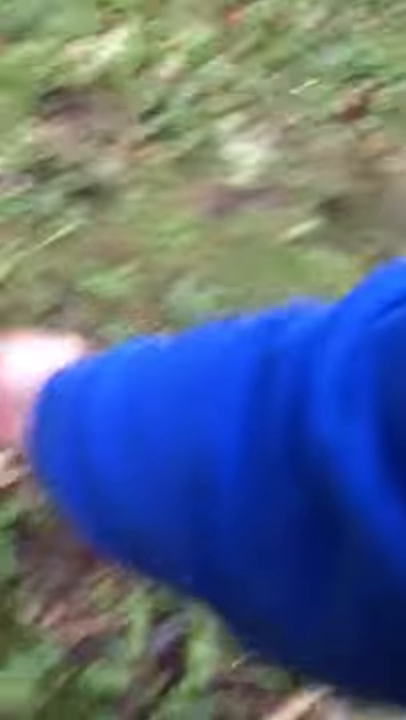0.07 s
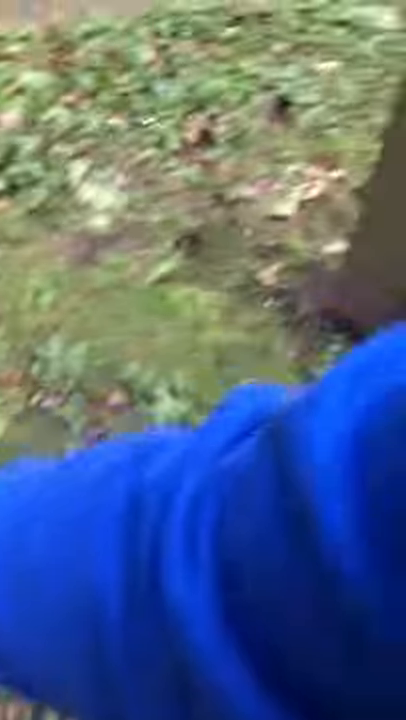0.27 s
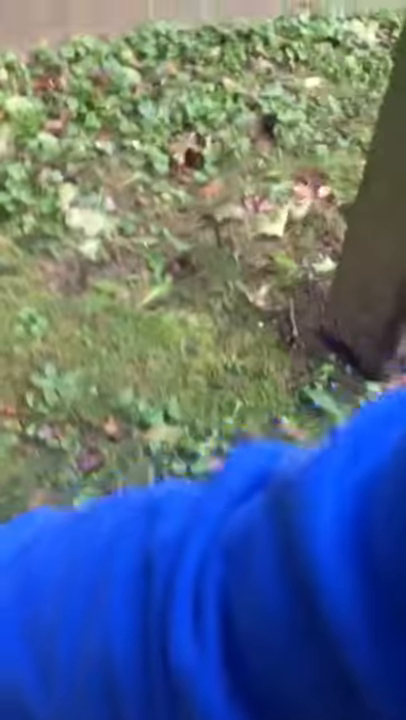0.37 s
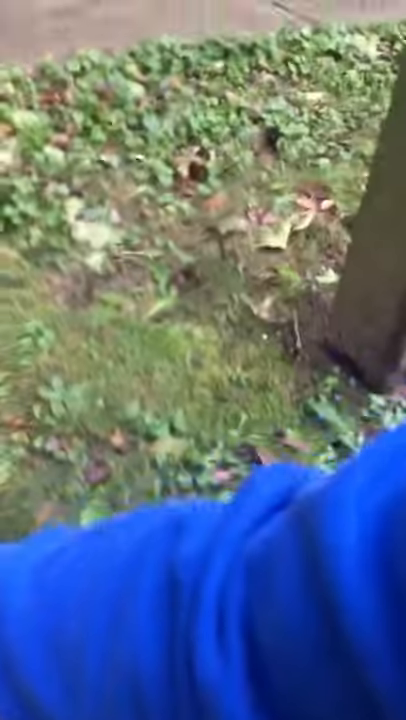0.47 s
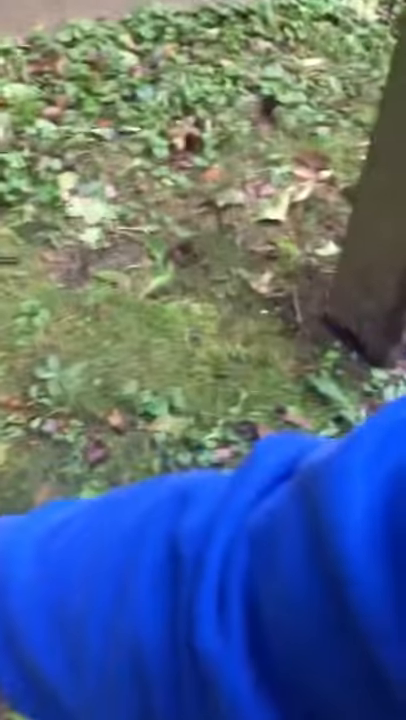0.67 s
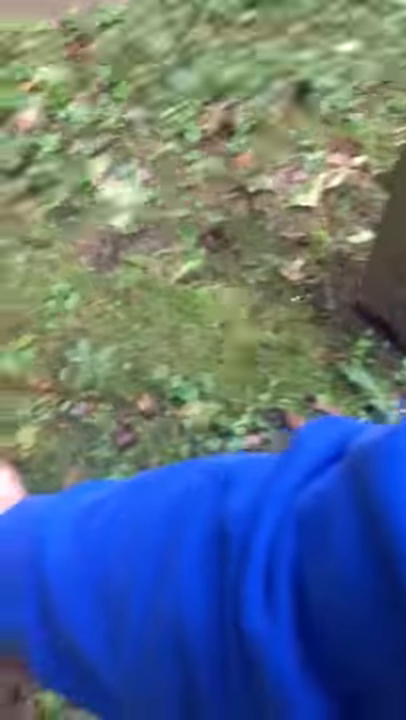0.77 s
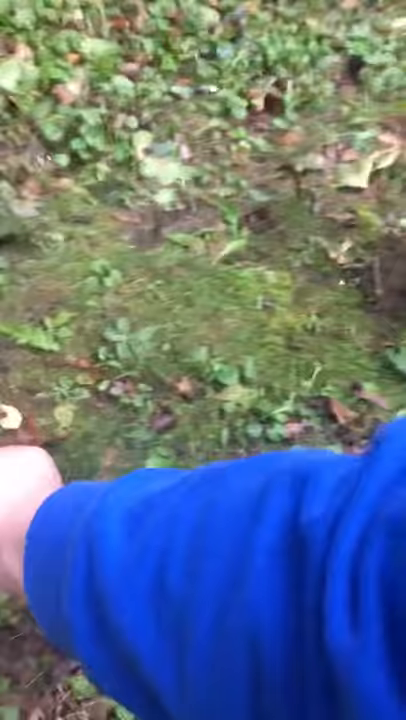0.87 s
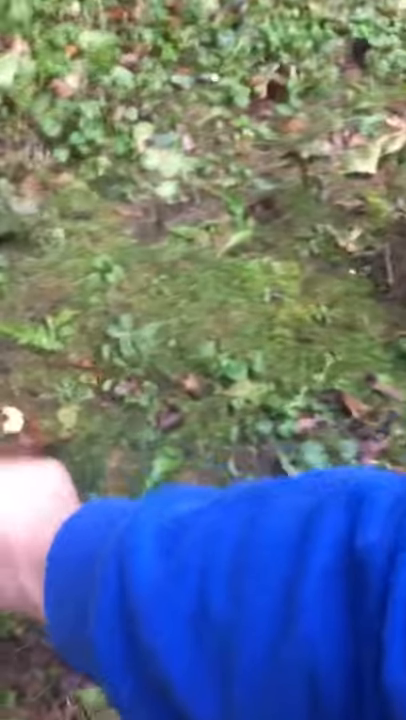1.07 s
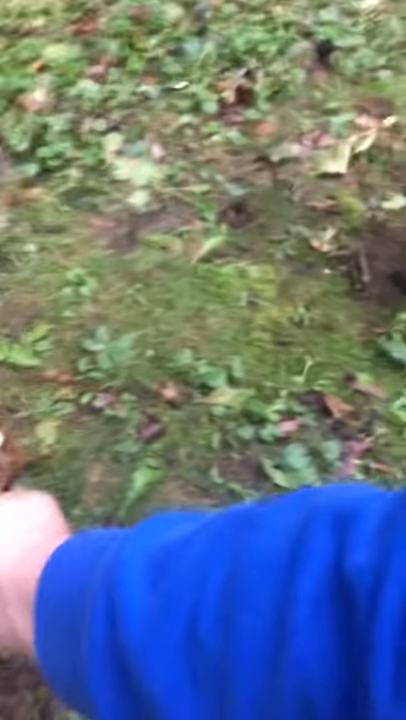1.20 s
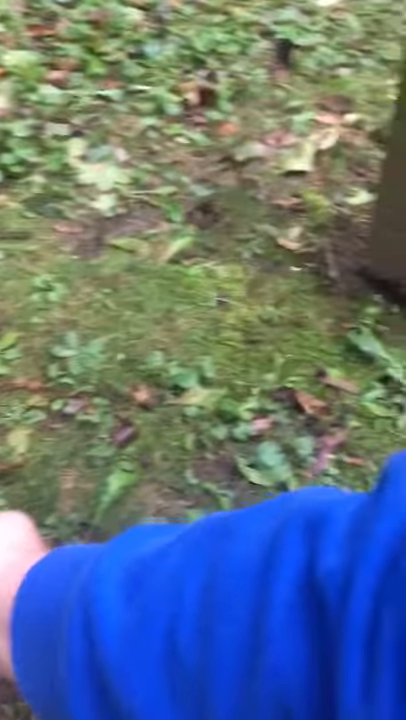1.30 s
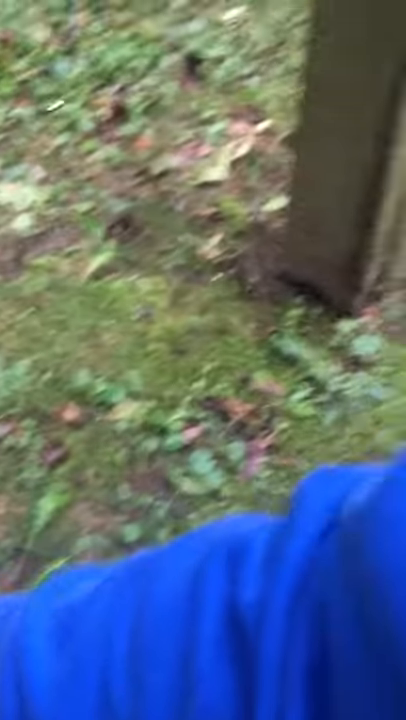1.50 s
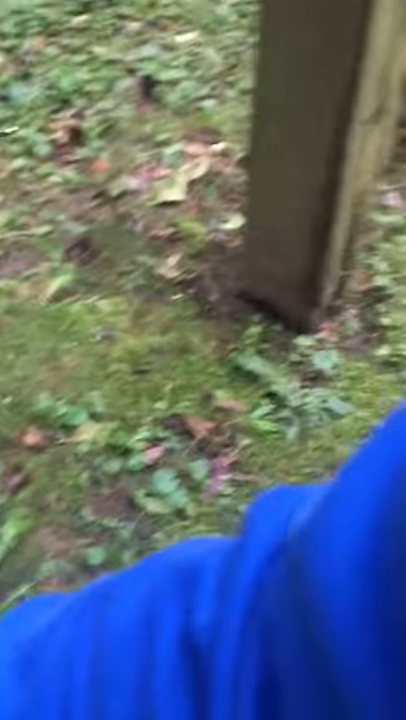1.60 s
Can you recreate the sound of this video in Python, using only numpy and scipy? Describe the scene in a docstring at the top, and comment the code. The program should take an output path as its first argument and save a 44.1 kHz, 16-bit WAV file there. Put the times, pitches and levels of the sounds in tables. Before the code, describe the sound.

Close fleece rustling in two hissy swipes with brief clicks in a quiet garden.

```python
"""Fleece sleeve brushing a phone

After one brief scuff, a fleece sleeve brushes twice past a hand-held phone in a quiet garden.
Countless fibres catch and slip as a bright hiss over a duller rub, and single threads tick free.
A few sharp, close clicks snap and ring for a millisecond; the hand bumps softly as its grip shifts.
Underneath lies an outdoor bed of low rumble, distant hum, air and faint hiss. The sound is mono."""
import sys
import numpy as np
from scipy import signal
from scipy.fft import rfft, irfft, next_fast_len
from scipy.io import wavfile
from scipy.ndimage import uniform_filter1d

SR = 44100
rng = np.random.default_rng(int(sys.argv[2]) if len(sys.argv) > 2 else 0)


def wav_out(sig):
    """Save sig, one row per channel (or a flat mono array), as 16-bit PCM at SR to the path in sys.argv[1]."""
    wavfile.write(sys.argv[1], SR, np.round(np.clip(np.atleast_2d(sig).T, -1, 1) * 32767).astype(np.int16))


N = 72765

# sleeve speed in each stroke, as the envelope of its hiss (time [s], level [dB])
FIRST_STROKE = [(.11, -64), (.145, -61), (.2, -47.5), (.23, -40.5), (.275, -38.5), (.3, -35.5), (.35, -35),
                (.385, -40), (.415, -48), (.45, -54), (.515, -58.5), (.545, -65), (.61, -67.5)]
SECOND_STROKE = [(.6, -63), (.665, -54.5), (.715, -46), (.752, -46.5), (.81, -46), (.855, -39.5),
                 (.9, -40.5), (.93, -42.5), (.965, -43), (.995, -48), (1.015, -53), (1.06, -65),
                 (1.085, -70.5)]
# envelopes of the dull rub, the thin top sheen and the narrow rasp (time [s], level [dB])
RUB_LEVEL = [(.12, -68.5), (.2, -60.5), (.29, -53), (.35, -53), (.42, -58.5), (.5, -60.5), (.57, -67),
             (.62, -66), (.69, -61), (.77, -68.5), (.88, -63), (.97, -81), (1.08, -65.5)]
SHEEN_LEVEL = [(.115, -72), (.165, -54), (.23, -51), (.3, -52), (.36, -43), (.41, -61)]
RASP_LEVEL = [(.78, -64), (.825, -63), (.85, -54.5), (.885, -78), (.93, -72), (.98, -100), (1.02, -82)]
# tone of the two strokes, the rub and the scuff (frequency [Hz], relative level [dB])
FIRST_EQ = [(1500, -48.5), (3000, -14.5), (4200, -12), (5600, -16), (7000, -6), (9000, -1), (10200, 0.5),
            (12300, -3.5), (14300, -0.5), (16000, -3)]
SECOND_EQ = [(1500, -23.5), (3200, -17), (4400, -12), (5700, -17), (6600, -9), (7600, -5.5), (9100, -0.5),
             (10000, 0), (12500, -2), (14000, -6.5), (16000, -2)]
RUB_EQ = [(120, -12.5), (280, 7), (700, 0), (1200, 0), (2000, -0.5), (3500, -8), (6000, 1.5), (10000, -24)]
SCUFF_EQ = [(2000, -20), (3000, -34), (4000, -10), (4900, -31), (5800, -14), (6700, -20), (7600, -7),
            (9000, 1), (11000, -1.5), (13500, 1.5), (15200, 3), (16500, -2.5)]
# close clicks (time [s], snap peak [dB], ring gain [dB], ring length [factor], knock peak [dB])
CLICKS = [(0.3274, -17.5, -46, .7, -42), (.3578, -6, -55, 0.59, -23), (.367, -18, -47, .8, -50),
          (0.4, -32, -5.5, 0.96, -29.5), (0.435, -45.5, -49.5, 0.82, -36.5),
          (0.4715, -27.5, -41, 0.61, -49), (.514, -23.5, -54, 1, -51)]
# resonances of a click (frequency [Hz], relative level [dB], time constant [ms])
CLICK_MODES = [(302, -37, .8), (1780, -22.5, 0.24), (3870, -13, .19), (4400, -17, 0.26), (7990, -1.5, 0.18),
               (9270, -3, 0.22), (10400, -5, .17), (12680, -9.5, 0.12), (15640, -15, .2)]
# threads letting go (time [s], peak [dB])
THREAD_TICKS = [(.6585, -38), (.7072, -28), (.726, -31), (.739, -39), (1.0643, -31), (1.0669, -40),
                (1.0755, -43)]
# tone of the dry snap, the dull knock and the crisp tick (frequency [Hz], relative level [dB])
SNAP_EQ = [(300, -29.5), (1500, -22), (3000, -14.5), (4600, -6), (6000, -9.5), (8000, -3.5), (10800, 0),
           (13000, -1.5), (16000, -8)]
KNOCK_EQ = [(60, -9.5), (150, 0), (290, 4.5), (560, -5.5), (1000, 1), (1900, 0), (2700, -4), (4000, 0),
            (6000, 0), (10000, -16)]
TICK_EQ = [(2500, -45), (3900, -15), (4700, -4.5), (6200, -23), (7900, 1.5), (8800, -11.5), (10500, 2),
           (13000, -2), (16000, -9)]
# bumps of the hand on the phone (time [s], half-width [s], frequency [Hz], level [dB])
HAND_BUMPS = [(.22, 0.021, 74, -52.5), (0.965, .04, 94.5, -52)]
# tone of the outdoor layers (frequency [Hz], relative level [dB])
RUMBLE_EQ = [(20, -2.5), (40, -7), (60, 0.5), (82, 0.5), (125, -3.5), (170, -5), (250, -14), (400, -37)]
AIR_EQ = [(150, 3), (230, -6.5), (330, 0), (480, -0.5), (650, -1.5), (1000, -5), (1800, -15.5), (2900, -14),
          (3600, -38), (6000, -44.5), (11000, -15.5)]
HISS_EQ = [(2000, -11), (6000, -12), (8500, -12.5), (10000, -12.5), (11200, -18.5), (13000, -30),
           (16000, -15.5)]
# envelopes of the outdoor layers (time [s], level [dB])
HUM_LEVEL = [(0, -71), (.9, -83.5), (1.3, -69.5), (1.65, -72)]
AIR_LEVEL = [(0, -65.5), (.6, -65.5), (1.1, -62.5), (1.4, -62), (1.65, -61)]
HISS_LEVEL = [(0, -68.5), (.6, -67.5), (1.15, -73), (1.35, -73.5), (1.55, -69), (1.65, -82)]

SLIPS_PER_S, SLIP_SPREAD_DB = 20000, 2.57
FLUTTER_HZ, FLUTTER_DB = 89, 1.29
SNAGS_PER_S, SNAG_DB, SNAG_SPEED_POWER = 130, -51.5, 0.56


def sleeve_stroke(envelope, eq):
    """Fast sliding merges fibre slips into hiss; single snags stand out while the sleeve is slow."""
    gain = curve(envelope)
    fibres = colour(slips(SLIPS_PER_S, SLIP_SPREAD_DB), eq)
    hiss = unit(moving_folds(fibres)) * gain
    flutter = undb(FLUTTER_DB * waver(FLUTTER_HZ))
    snags = unit(colour(slips(SNAGS_PER_S, spread_db=2.2), eq))
    snag_gain = undb(SNAG_DB) * (gain / gain.max()) ** SNAG_SPEED_POWER
    return hiss * flutter + snags * snag_gain


def slips(per_s, spread_db):
    """Fibres catch and slip as tiny random impulses, most weak and a few strong; rms 1."""
    happens = rng.random(N) < per_s / SR
    strength = undb(spread_db * np.minimum(rng.exponential(size=N), 5))
    return unit(happens * strength * rng.choice([-1, 1], N))


def moving_folds(hiss, band_hz=1300, drift_hz=18, drift_db=1.1):
    """The tone shifts as the folds move: each band of the hiss drifts in level on its own."""
    f, spectrum = np.fft.rfftfreq(N, 1 / SR), rfft(hiss)
    out = 0
    for k in range(15):
        share = np.clip(1 - np.abs(f / band_hz - k), 0, 1)
        out = out + irfft(spectrum * share, N) * undb(drift_db * waver(drift_hz))
    return out


def narrow_slide(envelope, hz, octaves):
    """Fibre slips that favour one narrow range of pitch."""
    return curve(envelope) * band(slips(SLIPS_PER_S, SLIP_SPREAD_DB), hz, octaves)


def cloth_rub():
    """Duller cloth friction gives body under the hiss."""
    return unit(colour(slips(SLIPS_PER_S, spread_db=3), RUB_EQ)) * curve(RUB_LEVEL)


def scuff(start_s=0.0942, attack_s=0.004, hold_s=0.01, decay_s=0.0048, level_db=-42):
    """One quick slide of cloth: a short burst of fibre slips."""
    age = np.arange(N) / SR - start_s
    attack = np.clip(age / attack_s, 0, 1)
    release = np.exp(-np.maximum(age - attack_s - hold_s, 0) / decay_s)
    fibres = unit(colour(slips(SLIPS_PER_S, SLIP_SPREAD_DB), SCUFF_EQ))
    return undb(level_db) * attack * release * fibres


def clicks():
    """Each click layers a dry snap, a dull knock and a damped ring about a millisecond long."""
    t = np.arange(N // 100) / SR
    snap, knock = transient(SNAP_EQ, len(t)), transient(KNOCK_EQ, len(t))
    out = np.zeros(N + len(t))
    for s, snap_db, ring_db, length, knock_db in CLICKS:
        ring = 0
        for hz, db, ms in CLICK_MODES:
            age = t / (length * ms / 1000)
            swell = (age / 2) ** 2 * np.exp(2 - age)  # peaks at 1 after two time constants
            ring = ring + undb(db) * swell * np.sin(2 * np.pi * hz * t)
        start = int(s * SR)
        out[start:start + len(t)] += undb(snap_db) * snap + undb(ring_db) * ring + undb(knock_db) * knock
    return out[:N]


def thread_ticks():
    """Single threads let go with a thin, crisp tick."""
    pulses = np.zeros(N)
    for s, db in THREAD_TICKS:
        pulses[int(s * SR)] += undb(db)
    return signal.fftconvolve(pulses, transient(TICK_EQ, samples=512))[:N]


def hand_bumps():
    """Low, soft swells as the hand shifts its grip."""
    t = np.arange(N) / SR
    out = 0
    for s, half_width, hz, db in HAND_BUMPS:
        swell = np.exp(-.5 * ((t - s) / half_width) ** 2)
        out = out + undb(db) * swell * band(rng.standard_normal(N), hz, octaves=0.46)
    return out


def garden_bed(rumble_db=-56):
    """Distant rumble and hum, a soft wash of air and a thin hiss."""
    rumble = undb(rumble_db) * noise(RUMBLE_EQ)
    hum = curve(HUM_LEVEL) * band(rng.standard_normal(N), hz=473.6, octaves=0.069)
    air = curve(AIR_LEVEL) * noise(AIR_EQ)
    hiss = curve(HISS_LEVEL) * noise(HISS_EQ)
    return rumble + hum + air + hiss


def undb(db):
    """Decibels to gain."""
    return 10 ** (np.asarray(db) / 20)


def unit(x):
    """Scale to rms 1."""
    return x / np.sqrt(np.mean(x ** 2) + 1e-18)


def curve(points, fade_s=0.0079):
    """Gain envelope through (time [s], level [dB]) points, fading fast outside them."""
    s, db = np.array(points).T
    t = np.arange(N) / SR
    outside = np.maximum(s[0] - t, 0) + np.maximum(t - s[-1], 0)
    return undb(np.interp(t, s, db)) * np.exp(-outside / fade_s)


def colour(x, eq):
    """Minimum-phase EQ through (frequency [Hz], gain [dB]) points."""
    hz, db = np.array(eq).T
    size = next_fast_len(2 * N, real=True)
    size += size % 2
    f = np.maximum(np.fft.rfftfreq(size, 1 / SR), 1)
    gain = undb(np.interp(np.log(f), np.log(hz), db))
    cepstrum = irfft(np.log(gain))
    cepstrum[1:size // 2] *= 2
    cepstrum[size // 2 + 1:] = 0  # no ringing ahead of an attack
    return irfft(rfft(x, size) * np.exp(rfft(cepstrum)))[:N]


def band(x, hz, octaves):
    """One smooth, bell-shaped pass band; rms 1."""
    f = np.maximum(np.fft.rfftfreq(N, 1 / SR), 1)
    bell = np.exp(-.5 * (np.log2(f / hz) / octaves) ** 2)
    return unit(irfft(rfft(x) * bell, N))


def noise(eq):
    """Coloured noise of rms 1."""
    return unit(colour(rng.standard_normal(N), eq))


def transient(eq, samples):
    """A single coloured impulse of peak 1."""
    pulse = colour(signal.unit_impulse(N), eq)[:samples]
    return pulse / np.max(np.abs(pulse))


def waver(hz):
    """Smooth random modulation of rms 1."""
    span = max(int(SR / hz), 1)
    return unit(uniform_filter1d(uniform_filter1d(rng.standard_normal(N), span), span))


def scene():
    """Cloth, clicks, handling and garden, the same in both channels."""
    first = sleeve_stroke(FIRST_STROKE, FIRST_EQ)
    sheen = narrow_slide(SHEEN_LEVEL, hz=15000, octaves=0.09)  # tops the first stroke
    second = sleeve_stroke(SECOND_STROKE, SECOND_EQ)
    rasp = narrow_slide(RASP_LEVEL, hz=4520, octaves=0.2)  # roughens the second
    cloth = scuff() + first + sheen + second + rasp + cloth_rub()
    mono = cloth + clicks() + thread_ticks() + garden_bed() + hand_bumps()
    return np.array([mono, mono])


def record(dry, cutoff_hz=15850):
    """The phone cuts the top end steeply."""
    lowpass = signal.firwin(301, cutoff_hz, fs=SR)
    return signal.fftconvolve(dry, lowpass[None], mode="same", axes=1)


dry = scene()
out = record(dry)
wav_out(out)
```